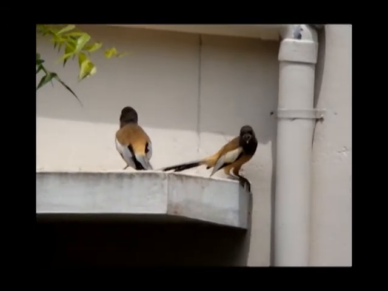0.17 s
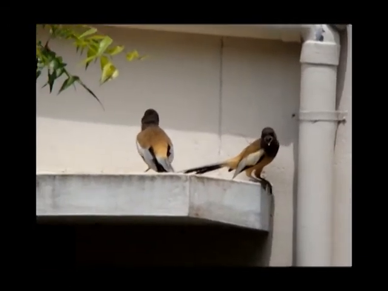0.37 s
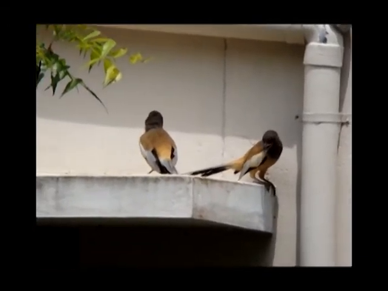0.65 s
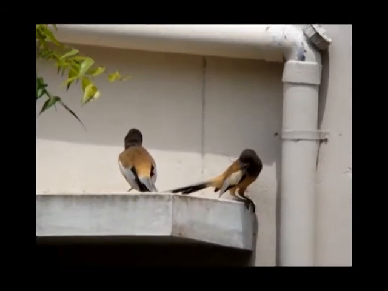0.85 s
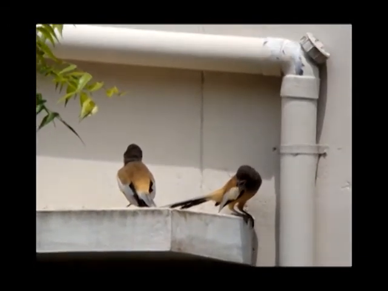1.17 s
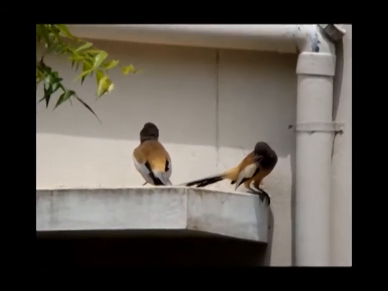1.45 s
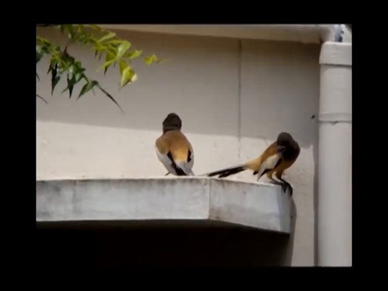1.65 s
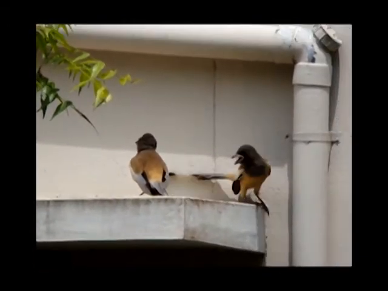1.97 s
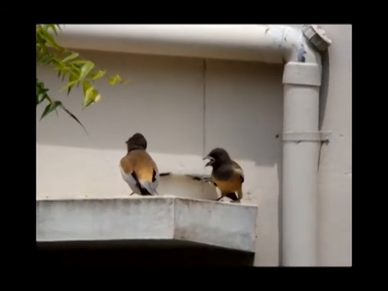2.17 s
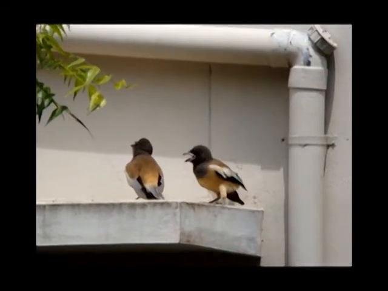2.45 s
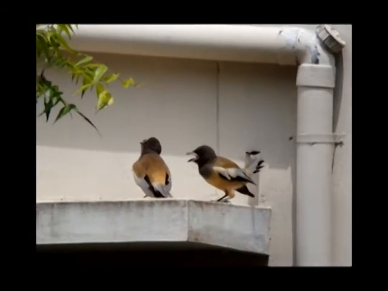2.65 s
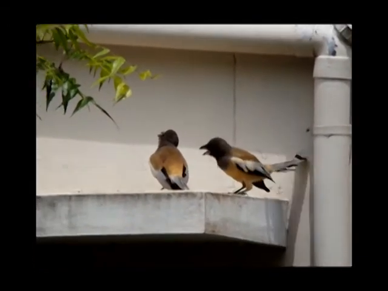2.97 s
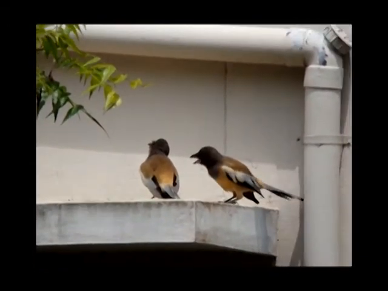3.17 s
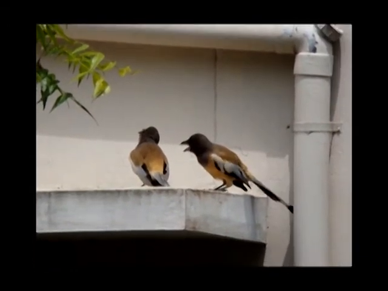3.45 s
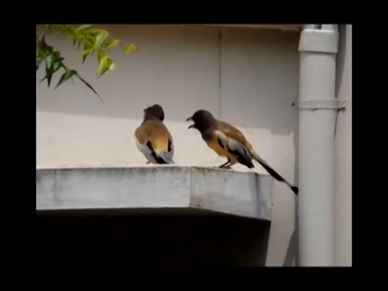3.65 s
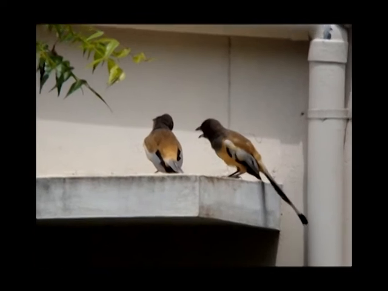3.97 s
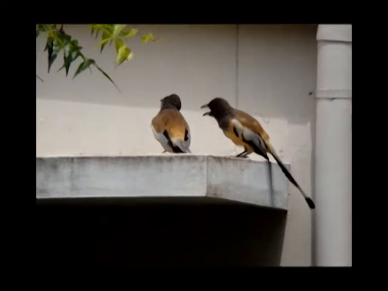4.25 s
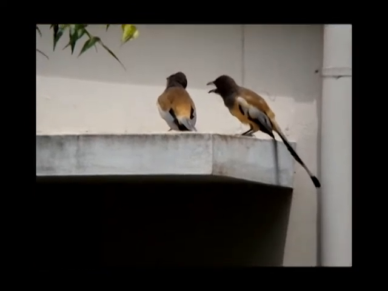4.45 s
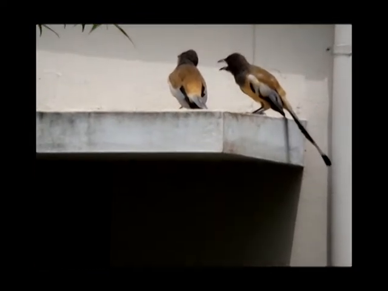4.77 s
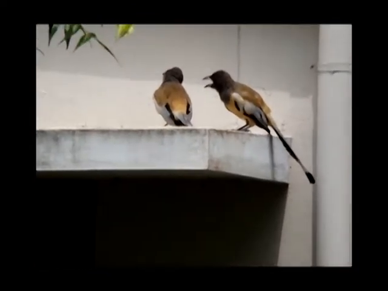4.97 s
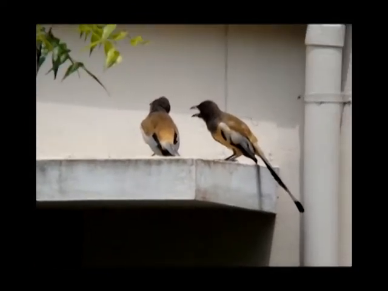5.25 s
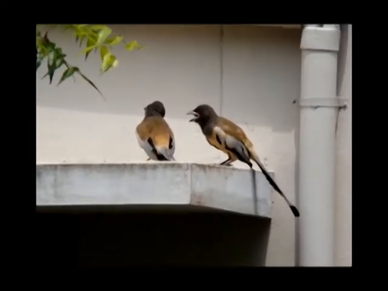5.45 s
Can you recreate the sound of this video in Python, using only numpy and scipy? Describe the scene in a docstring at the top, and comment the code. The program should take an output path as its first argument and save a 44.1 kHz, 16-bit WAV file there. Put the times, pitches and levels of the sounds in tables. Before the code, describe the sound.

A quiet outdoor place beside a building, with a soft low hush of air and far traffic and a barely audible hum. From 0 to about 3.4 seconds, birds farther off call almost constantly: thin high squeals that leap up and hold, quick falling cries, short husky pips and hoarse, noisy rasps, with faint random cries behind. A stronger rasp pushes upward near 1.9 seconds. From 3.4 to 4.4 seconds nearer treepies give a run of short, fluty, nearly pure gliding notes, mostly low and mellow. At about 4.4 seconds a harsh, loud, cracking screech jumps out, stepping up slightly in pitch, strongest around 4.55, ending near 4.75. Dry ticks sound at 4.4, 4.85 and faintly at 5.0. Fluty notes return from 4.7 to 5.3 seconds, with pips and a last rasp near 5.2. Walls and yard echo the calls; the overall level sinks after the screech.

```python
"""From the start, birds farther off squeal, pip, cry and rasp over a low outdoor hush, amid faint random cries.
Then treepies on a ledge of a house come in: gliding, nearly pure tones make a run of fluty notes.
A harsh, loud screech follows, made of rough voice pulses shaped by a throat, and then more fluty notes.
A few dry ticks ring during and after the screech. Walls and a yard throw the bird calls back.
An automatic level control turns the sound down at once when it gets too loud and recovers slowly."""
import sys
import numpy as np
from scipy import signal
from scipy.fft import rfft, irfft
from scipy.io import wavfile
from scipy.ndimage import uniform_filter1d

SR = 44100
rng = np.random.default_rng(int(sys.argv[2]) if len(sys.argv) > 2 else 0)


def wav_out(sig):
    """Save sig, one row per channel (or a flat mono array), as 16-bit PCM at SR to the path in sys.argv[1]."""
    wavfile.write(sys.argv[1], SR, np.round(np.clip(np.atleast_2d(sig).T, -1, 1) * 32767).astype(np.int16))


N = 247401
TIME = np.arange(N) / SR  # seconds

# All levels in the tables are those before the final mix.
# Tone of the outdoor hush. Each row: frequency in Hz, relative level in dB per Hz.
HUSH = [(25, -28.5), (50, -36), (80, -9.5), (115, -18.5), (150, -9), (300, -2), (600, -1), (1250, 0.5),
        (1700, -1.5), (3100, -2.5), (5000, -7.5), (7000, -10), (10000, -17)]
# Hum of the building. Each row: frequency in Hz, level in dB.
HUM = [(148, -68), (275, -68.5)]

# Held squeals farther off. Each row: start in seconds, length in seconds, pitch in Hz,
# opening leap as a share of the pitch, fundamental level in dB, octave level in dB, jitter as a share.
SQUEALS = [(0, 0.13, 2920, 0.026, -54, -57, 0.024), (0, 0.096, 3290, 0.046, -65, -58, 0.019),
           (0.352, 0.053, 2873, 0.058, -44, -55, 0.044), (0.524, .12, 3290, 0.22, -48.5, -50, 0.012),
           (0.793, 0.088, 3287, 0.27, -47, -43, 0.025), (1.085, 0.12, 3190, 0.31, -50.5, -47, 0.026),
           (1.58, .18, 1993, 0.1, -49, -60, 0.039), (1.641, 0.11, 3570, 0.25, -45, -52.5, 0.0044),
           (2.2, 0.081, 3760, 0.083, -43.5, -54, 0.0022), (2.358, 0.076, 4070, .04, -49.5, -61.5, 0.0074),
           (2.671, 0.2, 4045, 0.1, -83, -51.5, 0.025), (3.079, .1, 5090, 0.02, -52.5, -77, .0066),
           (3.145, 0.061, 3120, 0.019, -49.5, -79, 0.023), (3.24, 0.095, 3070, 0, -60.5, -69, 0.017),
           (3.492, 0.21, 4330, 0.1, -71, -53, 0.011), (3.94, .04, 2836, 0.0056, -54, -68, .004),
           (3.998, 0.062, 5280, 0, -58.5, -80, 0.0042)]
LEAP_S, DROOP = 0.014, 0.03  # time constant of the leap; droop at the end as a share of the pitch

# Clearest pips of a distant bird. Each row: start in seconds, length in seconds, peak level in dB.
PIPS = [(0.022, 0.097, -44), (1.009, .05, -43.5), (1.765, 0.029, -38.5), (1.974, 0.014, -40),
        (2.211, .065, -41.5), (2.49, 0.06, -44), (3.012, 0.057, -42), (4.997, .03, -37.5),
        (5.235, 0.023, -38)]
PIP_HZ = 1305
# A loose series of other short pips goes on behind them; the gap is an average.
SERIES_GAP_S, SERIES_PIP_S, SERIES_HZ, SERIES_DB = 0.24, 0.018, 1165, -43.5

# Faint cries all round, at random times and pitches, until the fluty notes are under way.
CHORUS_END_S, CHORUS_LOW_HZ, CHORUS_HIGH_HZ, CHORUS_CRY_S = 3.65, 2058, 4410, 0.13
CHORUS_DB, CHORUS_OCTAVE_DB, CHORUS_JITTER = -58.5, -60, 0.0412

# Falling cries. Each row: start in seconds, length in seconds, start pitch in Hz, end pitch in Hz, level in dB.
CRIES = [(0.096, .165, 4370, 3270, -38.5), (0.189, .07, 3597, 2750, -43), (.608, 0.088, 4970, 3810, -52),
         (0.915, 0.086, 4890, 3750, -44), (1.176, 0.071, 3036, 2460, -47), (1.302, .14, 3883, 3107, -42),
         (1.806, 0.14, 4370, 3160, -46), (3.35, 0.1, 4460, 4120, -52.5), (4.339, .016, 3690, 3550, -33)]
CRY_BEND, CRY_JITTER, CRY_OCTAVE_DB = 1.5, 0.014, -16  # the fall steepens with this power of time

# Harsh rasps. Each row: start in seconds, length in seconds, centre in Hz,
# rise as a share of the centre, level in dB.
RASPS = [(0.576, 0.17, 4100, -0.19, -46.5), (0.829, 0.23, 4123, -0.14, -47.5),
         (1.168, 0.38, 4387, -.07, -46), (1.924, 0.18, 4217, .48, -41.5), (2.456, 0.12, 3700, 0.054, -48.5),
         (2.702, 0.3, 3260, .15, -61), (2.983, 0.17, 3840, 0.35, -46), (3.53, 0.092, 2870, -0.14, -48.5),
         (3.655, 0.059, 7180, -0.03, -46), (4.219, 0.17, 3560, -0.11, -42), (5.199, 0.16, 3685, -0.1, -47)]
RASP_WIDTH_HZ, WHISTLE_PER_RISE = 2510, 1.4  # a rasp that is pushed upward gains a hoarse whistle
# A weaker, fixed resonance below the gliding one.
RASP_CHEST_HZ, RASP_CHEST_WIDTH_HZ, RASP_CHEST_DB = 2250, 700, -9

# Fluty notes before and after the screech. Each row: start in seconds, length in seconds, pitch in Hz,
# fall as a share of the pitch, level in dB.
NOTES = [(3.413, 0.091, 1540, 0.16, -33.5), (3.513, 0.033, 3660, 0.22, -38.5),
         (3.516, 0.021, 3090, 0.033, -31.5), (3.571, 0.038, 1000, 0.087, -30),
         (3.671, 0.085, 749.7, -0.057, -38), (3.868, 0.11, 938.4, 0.0072, -29),
         (4.125, 0.029, 2100, 0.11, -32.5), (4.197, 0.1, 780, 0.38, -45.5), (4.297, 0.13, 1197, 0.059, -32),
         (4.741, 0.093, 1619, 0.092, -30), (4.89, 0.089, 976, 0.095, -38), (4.988, 0.15, 759, -.13, -46),
         (5.186, 0.141, 877.6, 0.04, -35.5)]
# The further a note falls, the huskier it is; most of the fall comes early.
NOTE_JITTER, JITTER_PER_FALL, FALL_BEND = 0.0089, 0.18, 2.2

# The course of the screech. Each row: time in seconds, effort in dB, level of the third harmonic in dB,
# level of the treble in dB. The last two set the balance inside the voice.
SCREECH = [(4.377, -14, -18, -15), (4.406, -15, -7, -7), (4.449, -24.5, 12, 5.5), (4.487, -29, 2, 6.5),
           (4.517, -6.5, -0.5, 0), (4.56, 0.5, -11, -9.5), (4.644, -11.5, 9.5, 6), (4.688, -3, -17, -17),
           (4.726, -12.5, 20, -13), (4.745, -22, -2, -20)]
# Throat and open beak. Each row: frequency in Hz, gain in dB.
THROAT = [(300, -18), (800, -12), (1120, -20), (1600, -11.5), (2250, 7.5), (2750, -1), (3300, -3.5),
          (4000, -19.5), (4600, -13), (5100, -16), (5700, -6), (6750, -2), (7400, -7.5), (8100, -18),
          (10000, -19.5)]
SCREECH_LOW_HZ, SCREECH_HIGH_HZ, STEP_AT_S, STEP_S = 1069, 1151, 4.548, 0.031  # midway the pitch steps up
OVERSHOOT, SETTLE_S = 0.0557, 0.01275  # it starts sharp by this share and settles
# The voice cracks as it starts and as it steps.
ROUGH_STEADY, ROUGH_BREAK, ROUGH_ONSET_S, ROUGH_STEP_S = 0.57, 0.66, 0.05, 0.038

# Dry ticks, perhaps of the beak. Each row: start in seconds, gain in dB.
TICKS = [(4.42, -16.5), (4.853, -16.5), (5.03, -26.5)]
# What a tick rings with. Each row: frequency in Hz, level in dB, time to die by 60 dB in seconds.
BEAK = [(4160, 7, 0.0053), (5700, -22, 0.0065), (8000, 2.5, 0.0027)]

# Nearest walls. Each row: delay in seconds, level in dB.
WALLS = [(.0046, -35), (0.0123, -4), (.029, -13.5)]
# Ring of the yard. Each row: frequency in Hz, time to die by 60 dB in seconds.
YARD = [(300, 0.17), (1000, 0.78), (2300, 0.63), (4000, 0.68), (7000, 0.47), (10000, 0.58)]


def gain_of(db):
    """Turns decibels into amplitude."""
    return 10 ** (np.asarray(db) / 20)


def evened(x):
    """Scales a sound to an rms (average strength) of 1."""
    return x / np.sqrt(np.mean(x ** 2) + 1e-20)


def read(points, hz):
    """Reads a table between its rows, on a log-frequency axis."""
    f, value = np.transpose(points)
    return np.interp(np.log(hz + 1), np.log(f + 1), value)


def colour(x, points):
    """Makes each frequency louder or softer as a table says."""
    hz = np.fft.rfftfreq(len(x), 1 / SR)
    return irfft(rfft(x) * gain_of(read(points, hz)), len(x))


def add(mix, s, sound):
    """Mixes a sound in at time s, in seconds."""
    part = mix[max(round(s * SR), 0):][:len(sound)]
    part += sound[:len(part)]


def wander(size, hz):
    """Smooth random motion of rms 1 that moves up to about hz times a second."""
    f = np.fft.rfftfreq(32768, 1 / SR)
    noise = rng.standard_normal(2 * len(f) - 2)
    return evened(irfft(rfft(noise) / np.sqrt(1 + (f / hz) ** 4)))[:size]


def swell(u, rise, fall):
    """Soft start and end over the shares rise and fall of a call."""
    return np.sin(np.pi / 2 * np.clip(np.minimum(u / rise, (1 - u) / fall), 0, 1))


def phase_of(hz):
    """Adds up a pitch curve into a running phase."""
    return 2 * np.pi * np.cumsum(hz) / SR


def hush(level_db=-47, hum_db=-2):
    """Steady air and far traffic as coloured noise, with a faint wavering hum from the building."""
    hum = np.zeros(N)
    for hz, db in HUM:
        hum += gain_of(db) * np.sqrt(2) * np.sin(phase_of(hz + 400 * rng.standard_normal(N)))
    air = evened(colour(rng.standard_normal(N), HUSH))
    return gain_of(level_db) * air + gain_of(hum_db) * hum


def thin_voice(hz, low_db, octave_db, jitter, breakup=0.53):
    """A thin cry along a pitch curve, with a jitter that grows hoarser towards its end."""
    u = np.linspace(0, 1, len(hz))
    growing_jitter = jitter * (1 + breakup * u ** 3)
    phase = phase_of(hz * (1 + growing_jitter * wander(len(u), hz=425)))
    upper = np.sin(2 * phase) + (1 - u) * gain_of(-6.5) * np.sin(3 * phase)
    # the period doubles at the start, which puts a tone between the harmonics
    between = (1 - u) * gain_of(min(low_db, octave_db) + 0.5) * np.sin(3 * phase / 2)
    tone = gain_of(low_db) * np.sin(phase) + gain_of(octave_db) * upper + between
    shape = gain_of(3.5 * wander(len(u), hz=90)) * swell(u, rise=0.15, fall=0.2)
    return np.sqrt(2) * tone * shape


def squeals():
    """Thin voices that leap up to a pitch, hold it and droop."""
    out = np.zeros(N)
    for s, length, pitch, leap, low_db, octave_db, jitter in SQUEALS:
        t = TIME[:int(length * SR)]
        hz = pitch * (1 - leap * np.exp(-t / LEAP_S) - DROOP * (t / length) ** 6)
        add(out, s, thin_voice(hz, low_db, octave_db, jitter))
    return out


def pips(jitter=0.032):
    """Brief tones made husky by a jittering pitch: clear ones among a loose random series."""
    out = np.zeros(N)
    times = np.cumsum(SERIES_GAP_S * rng.uniform(0.5, 1.5, size=24))
    series = [(s, SERIES_PIP_S, SERIES_DB) for s in times]
    for pitch, rows in ((PIP_HZ, PIPS), (SERIES_HZ, series)):
        for s, length, db in rows:
            u = np.linspace(0, 1, int(length * SR))
            tone = np.sin(phase_of(pitch * (1 + jitter * wander(len(u), hz=200))))
            add(out, s, gain_of(db) * tone * swell(u, rise=0.25, fall=0.5))
    return out


def chorus(count=40, fall=0.12):
    """Many faint hoarse voices of random pitch, each sliding down a little."""
    out = np.zeros(N)
    u = np.linspace(0, 1, int(CHORUS_CRY_S * SR))
    for k, (late, high) in enumerate(rng.random((count, 2))):
        s = (k + late) / count * CHORUS_END_S
        pitch = CHORUS_LOW_HZ * (CHORUS_HIGH_HZ / CHORUS_LOW_HZ) ** high
        cry = thin_voice(pitch * (1 - fall * u), CHORUS_DB, CHORUS_OCTAVE_DB, CHORUS_JITTER)
        add(out, s, cry)
    return out


def cries():
    """The same thin voice sliding down ever faster."""
    out = np.zeros(N)
    for s, length, start, end, db in CRIES:
        u = np.linspace(0, 1, int(length * SR))
        hz = start + (end - start) * u ** CRY_BEND
        add(out, s, thin_voice(hz, db, db + CRY_OCTAVE_DB, CRY_JITTER))
    return out


def rasps(whistle_jitter=0.036):
    """Hoarse scolding: fluttering air noise in a gliding throat resonance, with a weaker fixed one below."""
    out = np.zeros(N)
    for s, length, centre, rise, db in RASPS:
        u = np.linspace(0, 1, int(length * SR))
        hz = centre * (1 + rise * (u - 0.5))
        phase = phase_of(hz)
        # two slow noises on a cosine and a sine make a band of noise around the gliding pitch
        air = wander(len(u), RASP_WIDTH_HZ / 2) * np.cos(phase)
        air = air + wander(len(u), RASP_WIDTH_HZ / 2) * np.sin(phase)
        whistle_hz = hz * (1 + whistle_jitter * wander(len(u), hz=398))
        whistle = WHISTLE_PER_RISE * max(rise, 0) * evened(np.sin(phase_of(whistle_hz)))
        chest_tone = np.sin(2 * np.pi * RASP_CHEST_HZ * TIME[:len(u)])
        chest = gain_of(RASP_CHEST_DB) * wander(len(u), RASP_CHEST_WIDTH_HZ / 2) * chest_tone
        shape = gain_of(3.5 * wander(len(u), hz=140)) * swell(u, rise=0.4, fall=0.35)
        add(out, s, gain_of(db) * evened((air + chest + whistle) * shape))
    return out


def notes(onset_cycles=16, husk_db=70):
    """Nearly pure gliding tones that take some cycles to build up; the falling ones are husky."""
    out = np.zeros(N)
    for s, length, pitch, fall, db in NOTES:
        u = np.linspace(0, 1, int(length * SR))
        hz = pitch * (1 + fall * ((1 - u) ** FALL_BEND - 1 / (FALL_BEND + 1)))
        jitter = NOTE_JITTER + JITTER_PER_FALL * max(fall, 0)
        phase = phase_of(hz * (1 + jitter * wander(len(u), hz=201)))
        tone = np.sin(phase) + gain_of(-43) * np.sin(2 * phase) + gain_of(-43) * np.sin(3 * phase)
        shape = swell(u, rise=onset_cycles / (pitch * length), fall=0.45)
        # unsteady notes also shake in level
        shape = shape * gain_of(husk_db * jitter * wander(len(u), hz=160))
        add(out, s, gain_of(db) * evened(tone * shape))
    return out


def screech(flutter_hz=120, flutter=0.043, jitter=0.017, breath=0.14, smear=0.41):
    """A hard-driven syrinx (a bird's voice box): fluttering, alternating pulses and air through the throat."""
    s, *columns = np.transpose(SCREECH)
    t = np.arange(s[0], s[-1], 1 / SR)
    effort_db, third_db, treble_db = (np.interp(t, s, c) for c in columns)

    step = (1 + np.tanh((t - STEP_AT_S) / STEP_S)) / 2
    hz = SCREECH_LOW_HZ + (SCREECH_HIGH_HZ - SCREECH_LOW_HZ) * step
    hz = hz * (1 + OVERSHOOT * np.exp((s[0] - t) / SETTLE_S))
    onset_crack = np.exp(-((t - s[0]) / ROUGH_ONSET_S) ** 4)
    step_crack = np.exp(-((t - STEP_AT_S) / ROUGH_STEP_S) ** 2)
    rough = ROUGH_STEADY + ROUGH_BREAK * (onset_crack + step_crack)
    shake = np.sin(2 * np.pi * flutter_hz * t + 1.8 * wander(len(t), hz=26))
    unsteady = flutter * shake + jitter * wander(len(t), hz=204)
    phase = phase_of(hz * (1 + rough * unsteady))

    # the period doubles and doubles again, which puts faint lines between the harmonics
    halves = np.sin(phase / 2 + 1.5 * wander(len(t), hz=59.7))
    quarters = np.sin(phase / 4 + 0.73 * wander(len(t), hz=59.7))
    phase = phase + rough * (0.075 * halves + 0.014 * quarters)
    pulses = evened(sum(np.cos(k * phase) for k in np.arange(1, 10)))
    pulses = pulses * (1 + 0.12 * rough * halves)  # strong and weak in turn
    air = (1 + np.cos(phase)) * wander(len(t), hz=9100)
    voice = colour(pulses + breath * rough * air, THROAT)

    # split the voice into low part, third harmonic and treble; rows are Hz, dB
    low = colour(voice, [(2500, 0), (3200, -14), (5000, -30)])
    third = gain_of(third_db) * colour(voice, [(2400, -35), (3050, 3), (3600, -4.5), (5000, -27)])
    treble = colour(voice, [(2400, -17), (3400, -3.5), (4400, 0)])
    # the highest partials smear into a rasp
    treble = treble * (1 + smear * rough * wander(len(t), hz=450))
    treble = gain_of(treble_db + 2.8 * wander(len(t), hz=50)) * treble
    voice = evened((low + third + treble) * (1 + 0.3 * rough * shake))

    out = np.zeros(N)
    add(out, s[0], gain_of(effort_db) * voice * signal.windows.tukey(len(t), 0.02))
    return out


def ticks(rise_s=0.00059):
    """Each snap rings a few tones that die away very fast."""
    out = np.zeros(N)
    t = TIME[:SR // 20]
    ring = sum(gain_of(db - 60 * t / t60) * np.sin(2 * np.pi * hz * t) for hz, db, t60 in BEAK)
    for s, db in TICKS:
        add(out, s, gain_of(db) * ring * np.minimum(t / rise_s, 1))
    return out


def walls(x):
    """The direct sound and delayed copies of it, its first reflections."""
    out = x.copy()
    for delay, db in WALLS:
        add(out, delay, gain_of(db) * x)
    return out


def yard(x, build_up_s=0.008):
    """Dense random echoes between the buildings, each band dying at its own speed."""
    hits = rng.choice([-1., 1.], SR) * (rng.random(SR) < 3000 / SR)  # about 3000 echoes a second
    taps = hits * np.minimum(TIME[:SR] / build_up_s, 1)
    hz, t, z = signal.stft(taps, SR, nperseg=256)
    t60 = read(YARD, hz)[:, None]
    tail = signal.istft(z * gain_of(-60 * t / t60), SR, nperseg=256)[1]
    return signal.fftconvolve(x, tail / np.linalg.norm(tail))[:N]


def duck(x, over_db, recovery_db_per_s, start_db=0):
    """Takes the excess off at once and gives the gain back at a steady rate."""
    fall = TIME * recovery_db_per_s
    held_db = np.maximum.accumulate(np.maximum(over_db + fall, start_db))
    cut_db = uniform_filter1d(np.maximum(held_db - fall, 0), size=60)
    return x / gain_of(cut_db)


def scene():
    """Mixes near birds, mostly direct, with far birds, mostly echo, over the hush."""
    fluty, harsh = notes(), screech()
    far = squeals() + cries() + rasps() + chorus()
    piping = pips()
    direct = walls(harsh) + fluty + ticks() + gain_of(-0.5) * far + piping
    near = gain_of(-7) * (harsh + fluty + piping)
    echo = yard(near + gain_of(2.5) * far)
    return (direct + echo + hush())[None]


def record(dry, target_db=-9.0, ceiling_db=-7):
    """Slow level control, still recovering at the start, then a quick peak limiter and a treble cut."""
    power_db = 10 * np.log10(abs(uniform_filter1d(dry[0] ** 2, size=700)) + 1e-12)
    x = duck(dry[0], power_db - target_db, recovery_db_per_s=8.5, start_db=3.5)
    peak_db = 20 * np.log10(abs(x) + 1e-9)
    x = duck(x, peak_db - ceiling_db, recovery_db_per_s=381)
    low_pass = signal.firwin(801, 10120, window=("kaiser", 8), fs=SR)
    return signal.oaconvolve(x, low_pass, "same")[None]


dry = scene()
out = record(dry)
wav_out(out)
```